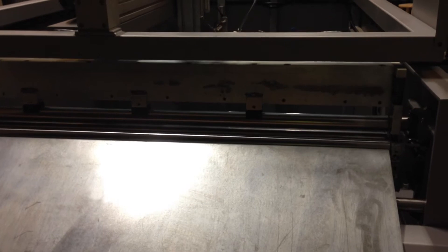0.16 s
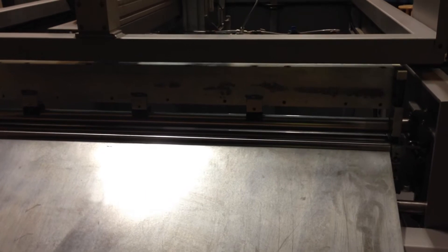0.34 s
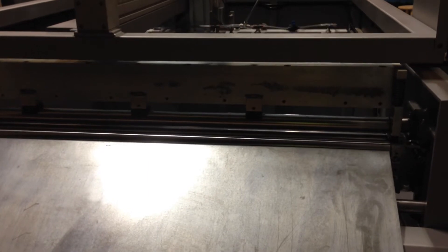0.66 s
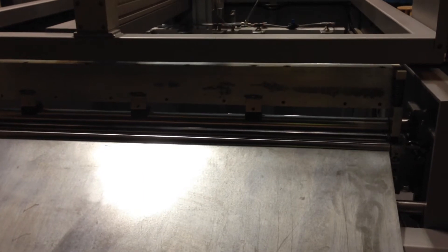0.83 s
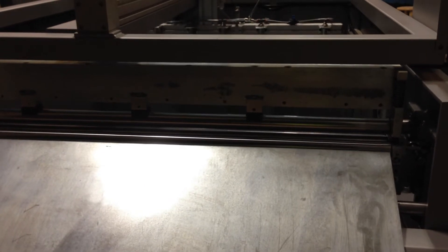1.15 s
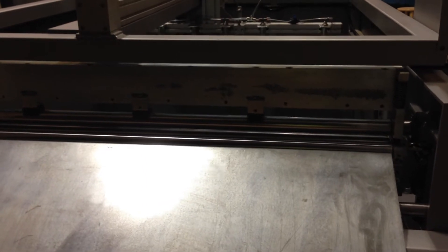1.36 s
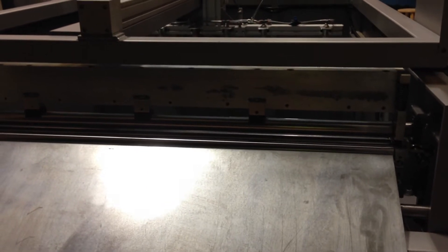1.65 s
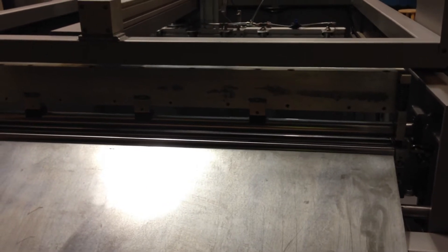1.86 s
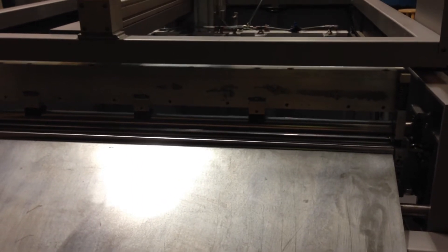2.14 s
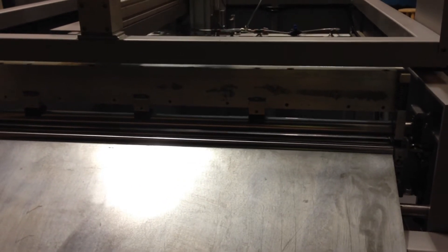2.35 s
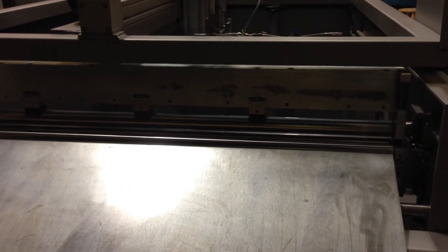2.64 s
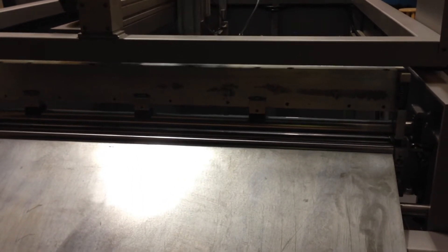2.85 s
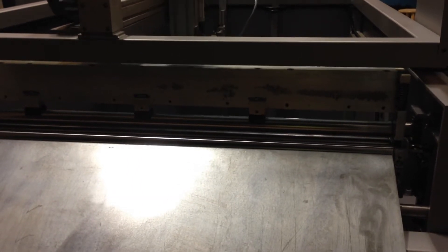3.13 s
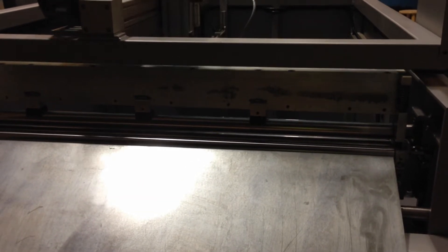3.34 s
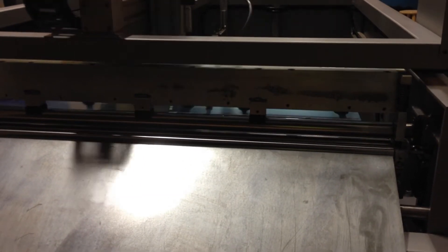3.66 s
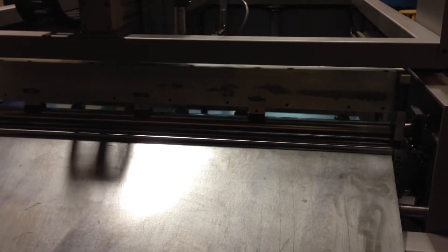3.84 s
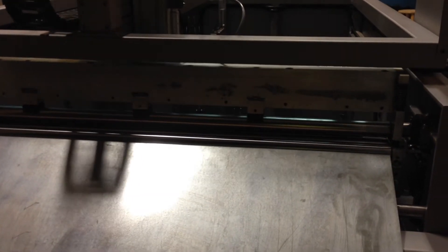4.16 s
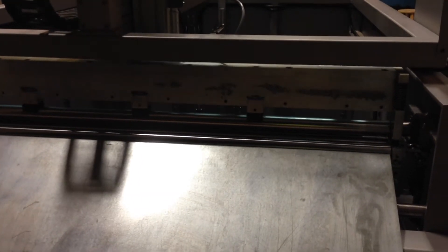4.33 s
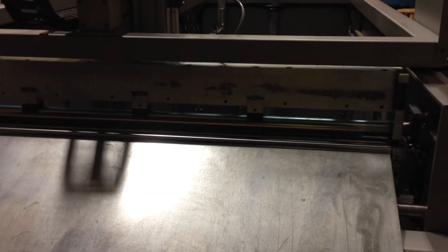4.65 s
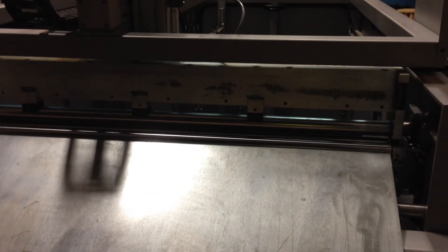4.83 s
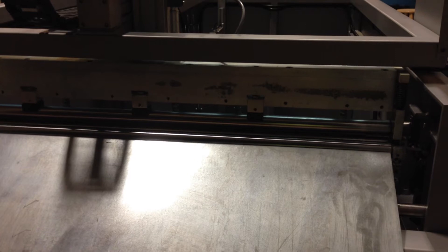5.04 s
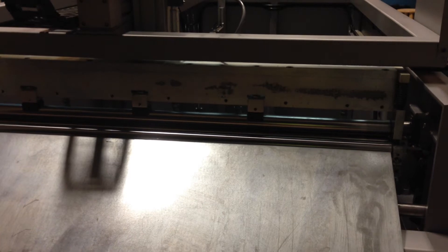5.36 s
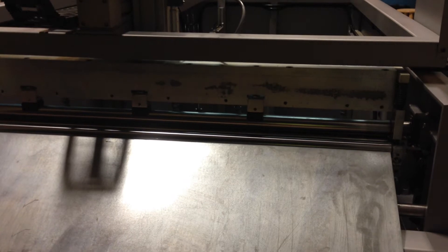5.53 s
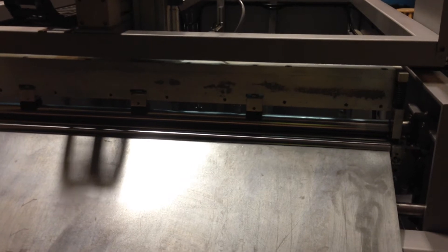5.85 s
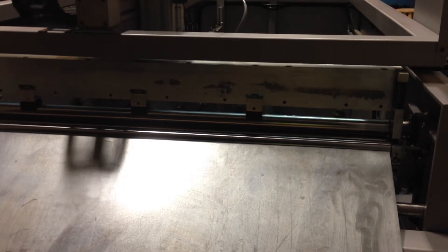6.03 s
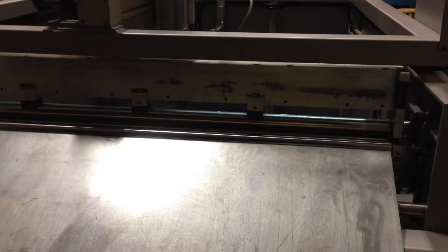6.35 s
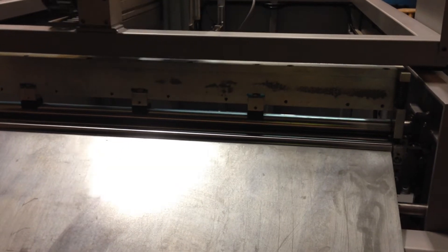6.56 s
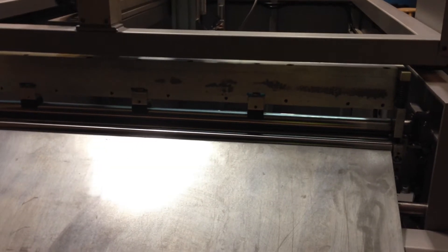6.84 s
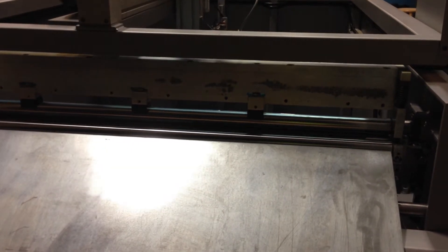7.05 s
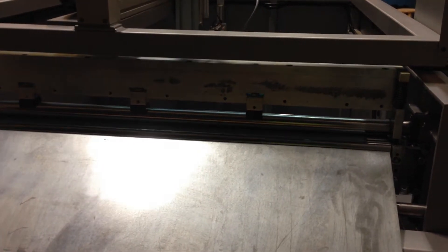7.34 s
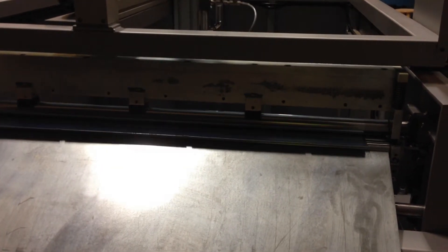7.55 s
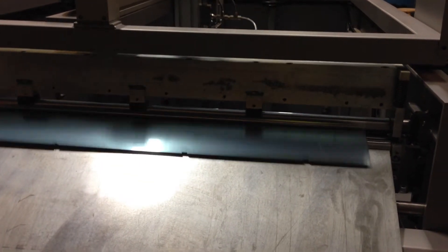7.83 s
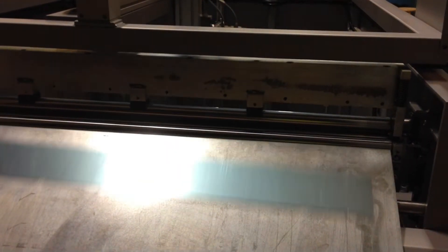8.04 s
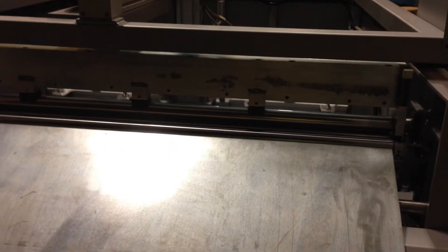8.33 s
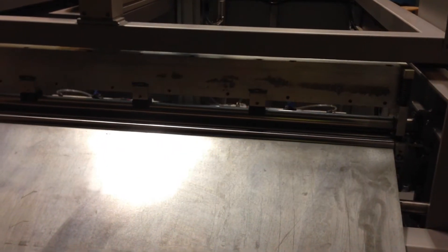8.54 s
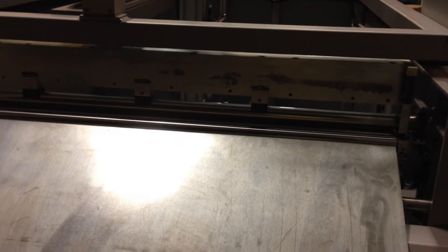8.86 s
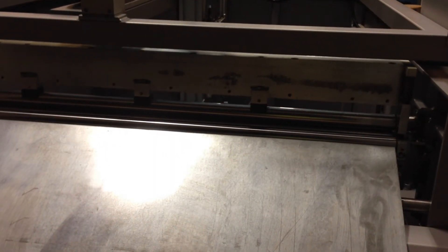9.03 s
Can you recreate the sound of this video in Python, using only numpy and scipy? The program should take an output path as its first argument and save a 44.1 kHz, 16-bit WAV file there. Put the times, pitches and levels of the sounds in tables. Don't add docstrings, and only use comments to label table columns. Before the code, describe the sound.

In a reverberant factory hall, heard close to a machine loader, a steady air leak hisses from 0 s with thin, very high drive whine, faint motor hums and low plant rumble. A distant dry squeak swells repeatedly until about 2.4 s. The hiss brightens and strengthens towards 4 s. At 5.43 s a valve snaps open: exhaust roars with a piercing, rough whistle, which steps to a slightly lower note near 5.75 s and collapses by 5.95 s. Hard steel clacks tumble from 5.97 to 6.14 s, with a second puff, its hiss and wall echo fading. The leak has stopped. Around 7 s the carriage groans and rattles off, gears whining as air rushes, swelling until a sharp stop at 7.94 s. Softer air continues; at 8.6 s a part lands with a hard clattering crack and an air burst. Gentle return air and dull knocks come near 9.1 s.

```python
import sys
import numpy as np
from scipy import signal
from scipy.fft import rfft, irfft, next_fast_len
from scipy.io import wavfile

SR = 44100
rng = np.random.default_rng(int(sys.argv[2]) if len(sys.argv) > 2 else 0)


def linear_from_db(decibels):
    return 10 ** (np.asarray(decibels, float) / 20)


def dump_mix(stems):
    frames = np.atleast_2d(stems).T
    limited = np.clip(frames, -1, 1)
    pcm = np.round(limited * 32767).astype(np.int16)
    wavfile.write(sys.argv[1], SR, pcm)


N = 405279
t = np.arange(N) / SR

# [t/s, level/dB]
EXHAUST_FLOW = [(5.45, -39), (5.466, -27), (5.502, -20.5), (5.586, -23.5), (5.78, -22.5), (5.885, -28.5),
                (5.95, -42), (6.3, -80), (6.9, -84)]


def columns(table):
    s, *cols = np.transpose(table)
    span = t[int(s[0] * SR):int(s[-1] * SR)]
    return [np.interp(span, s, c) for c in cols]


def walk(rate_hz, size):
    levels = rng.standard_normal(4096)
    return 1.13 * np.interp(np.arange(size) * rate_hz / SR, np.arange(4096), levels)


def swells(start_s, end_s, db, rise_s, fall_s):
    s = t[::88, None]
    before_s, after_s = np.clip(start_s - s, 0, None), np.clip(s - end_s, 0, None)
    drop_db = 20 * (before_s / rise_s + after_s / fall_s)
    return np.interp(t, s[:, 0], np.sqrt(np.sum(linear_from_db(db - drop_db) ** 2, axis=1)))


def air(colour, lo_hz, hi_hz, size, split_hz=6500, flicker_db=1.0):
    long = next_fast_len(size)
    hz = np.fft.rfftfreq(long, 1 / SR) + 1
    colour_hz, colour_db = np.transpose(colour)
    gain = linear_from_db(np.interp(np.log(hz), np.log(colour_hz), colour_db, -90, -90))
    x = rfft(rng.standard_normal(N + SR)[:long]) * gain
    band = (hz > lo_hz) & (hz < hi_hz)
    x /= np.sqrt(2 * np.sum(abs(x[band]) ** 2)) / long
    low = 1 / (1 + (hz / split_hz) ** 4)
    return [irfft(x * w, long)[:size] * linear_from_db(flicker_db * walk(14, size)) for w in (low, 1 - low)]


def blown(hz, width_hz, size):
    b, a = signal.iirpeak(hz, hz / width_hz, SR)
    x = rng.standard_normal(-(-size // SR) * SR)[:size]
    x = signal.lfilter(b, a, signal.lfilter(b, a, x))
    return x / x.std()


def tone(hz, flutter_db=2.0, rate_hz=30):
    phase = 2 * np.pi * (np.cumsum(hz) / SR + rng.random())
    return np.sqrt(2) * np.sin(phase) * linear_from_db(flutter_db * walk(rate_hz, len(hz)))


def ring(hz, t60_s):
    s = t[:int(SR * max(1.2 * t60_s, .01))]
    return np.sin(2 * np.pi * hz * s) * np.exp(-np.log(1000) * s / max(t60_s, 1e-4))


def add(out, at_s, x):
    i = int(at_s * SR)
    out[i:i + len(x)] += x[:N - i]


def place(x, table):
    out, edge = np.zeros(N), np.arange(len(x)) / 100
    start_s = table[0][0]
    fade = np.minimum(edge + (start_s == 0), edge[::-1] + 1)
    add(out, start_s, x * np.clip(fade, 0, 1))
    return out


def vent():
    # [t/s, f/Hz, level/dB, octave share/0-1]
    high_note = [(5.455, 1209, -36, .05), (5.467, 1202, -16, .02), (5.505, 1194, -18.5, .55),
                 (5.565, 1178, -17, .06), (5.7, 1181, -20, .3), (5.82, 1183, -20.5, .85),
                 (5.845, 1161, -19.5, .12), (5.887, 1158, -20, .25), (5.9, 1142, -32, .05)]
    low_note = [(5.74, 1152, -32, .5), (5.758, 1151, -19.5, .94), (5.88, 1124, -19.5, .14),
                (5.954, 1118, -21, .01), (5.98, 1138, -22, .5), (5.996, 1140, -35, .03),
                (6.1, 1152, -38, .15), (6.55, 1150, -61, .3)]
    roar = exhaust_roar()
    modes, pipe = draught()
    seat = whistle(high_note) + whistle(low_note)
    highpass = signal.butter(4, 1700, "high", fs=SR, output="sos")
    beats = signal.sosfilt(highpass, 3 * seat * pipe)
    return roar + modes + pipe + seat + beats


def whistle(note):
    # [multiple of pitch, level/dB re partial 4]
    upper_partials = [(3, 1.5), (5, -7), (6, -12), (7, -7), (8, -7), (9, -9), (10, -13), (11, -13),
                      (12, -15)]
    hz, db, octave = columns(note)
    size = len(hz)
    s, octave = np.arange(size) / SR, np.clip(octave, 0, 1)
    flow_db = np.interp(s + note[0][0], *np.transpose(EXHAUST_FLOW))
    full_flow_db, slope, rise_s = -28, 3.0, .02
    upper = linear_from_db(-30.5 + slope * np.minimum(flow_db - full_flow_db, 0)) * np.clip(s / rise_s, 0, 1)
    hz = hz * (1 + 0.003 * walk(118.5, size) + 0.004 * walk(500, size))
    first = np.sqrt(1 - octave) * tone(hz, 1.05, 60)
    second = np.sqrt(octave) * tone(2 * hz, 2.2, 60)
    out = linear_from_db(db) * (first + second) + upper * tone(4 * hz, 2.0, 60)
    for k, rel_db in upper_partials:
        skirt = 1 + .0008 * (k - 3) * walk(700, size)
        out += upper * linear_from_db(rel_db) * tone(k * hz * skirt, 3.0, 60)
    return place(out * (1 + 0.12 * walk(300, size)), note)


def exhaust_roar():
    # [f/Hz, density/dB per Hz]
    roar_colour = [(150, -37), (500, -12), (800, 4.5), (1200, 4), (1600, -0.5), (2300, -0.5), (3500, 2.5),
                   (5000, 3), (8000, 2), (11000, -1.5), (15200, -5.5), (15500, -40)]
    # [t/s, body/dB, treble/dB, 20 dB fall/s]
    puffs = [
        (5.466, -29, -60, .34),
        (5.91, -41, -60, .2),
        (5.974, -29.5, -60, .04),
        (6.066, -31, -36, .05),
        (6.084, -36, -31, .3),
    ]
    flow_db, = columns(EXHAUST_FLOW)
    low, high = air(roar_colour, 6760, 10400, len(flow_db), split_hz=3400, flicker_db=2.0)
    high = port(high)
    at_s, body_db, treble_db, fall_s = np.transpose(puffs)
    rise_s = .02
    puff_treble = swells(at_s, at_s, treble_db, rise_s, .65 * fall_s)
    treble = np.hypot(place(linear_from_db(flow_db), EXHAUST_FLOW), puff_treble)
    body = swells(at_s, at_s, body_db + 9, rise_s, fall_s) * place(low, EXHAUST_FLOW)
    return body + linear_from_db(-4.5) * treble * place(high, EXHAUST_FLOW)


def port(x):
    # [t/s, round trip/Hz, echo/0-1]
    port_pitch = [(5.45, 1170, 0.44), (5.7, 1170, 0.3), (5.78, 1169, 0.5), (5.86, 1135, .75),
                  (5.91, 1110, .6), (5.96, 1110, .05), (6.9, 1110, .05)]
    hz, echo = columns(port_pitch)
    i = np.arange(len(x))
    once, twice = np.interp(i - SR / hz, i, x), np.interp(i - 2 * SR / hz, i, x)
    return (x + echo * once + echo ** 2 * twice) / np.sqrt(1 + echo ** 2 + echo ** 4)


def draught():
    # [t/s, level/dB]
    draught_level = [(5.462, -34), (5.49, -21), (5.62, -24), (5.77, -26), (5.8, -42), (5.855, -45),
                     (5.88, -31), (5.95, -29.5), (6.05, -50)]
    # [f/Hz, width/Hz, level/dB]
    pipe_modes = [(1001, 35, -6), (1060, 30, -2.5), (1101, 30, -3), (2120, 45, -11), (4560, 60, -10)]
    blow_db, = columns(draught_level)
    size = len(blow_db)
    tone_db = -22 + 1.4 * (blow_db - blow_db.max())
    hz = 779 * (1 + 0.0048 * walk(120, size) + .012 * walk(30, size))
    pipe = place(linear_from_db(tone_db) * tone(hz, 1.9, 50), draught_level)
    modes = sum(linear_from_db(db) * blown(f, w, size) for f, w, db in pipe_modes)
    return place(linear_from_db(blow_db + 0.5) * modes, draught_level), pipe


def clacks():
    # [t/s, low ring/dB, low ring/Hz, high ring/Hz, crack/dB]
    valve_clacks = [
        (5.431, -41, 1170, 6000, -31),
        (5.974, -23, 1137, 2420, -34),
        (6.028, -22, 1110, 8000, -39),
        (6.062, -20, 1800, 8160, -18),
        (6.105, -15, 800, 3380, -36),
        (6.137, -22, 934, 3560, -42),
    ]
    carriage_clacks = [(7.029, -40, 780, 6990, -54), (7.048, -38, 900, 6660, -52),
                       (7.083, -29, 1396, 5800, -43), (7.091, -32, 1000, 4700, -47),
                       (7.098, -31, 1050, 5800, -46), (7.106, -30, 940, 4600, -45),
                       (7.117, -32, 1000, 4700, -50), (7.15, -35, 950, 3500, -54),
                       (7.224, -33, 980, 4800, -50), (7.291, -31, 680, 3450, -32.5),
                       (7.369, -38, 1000, 3500, -48), (7.49, -28, 930, 4800, -44),
                       (7.936, -36, 645, 2830, -32), (7.942, -22, 750, 2400, -26),
                       (9.117, -30.5, 1650, 2340, -48), (9.142, -25, 1305, 2050, -38),
                       (9.15, -36, 650, 1920, -41)]
    stop_clacks = [
        (8.561, -33, 1950, 5500, -39),
        (8.567, -29, 1230, 2870, -39),
        (8.576, -27, 1130, 2900, -40),
        (8.585, -15, 1300, 6400, -18),
        (8.592, -17, 1470, 2920, -19),
        (8.596, -21, 560, 5100, -12.5),
        (8.6025, -24, 1850, 4200, -18),
        (8.607, -26, 2400, 3400, -26),
        (8.634, -33, 1500, 2890, -35),
    ]
    # [t/s, level/dB, f/Hz]
    snaps = [
        (5.4305, -20, 7100),
        (7.9419, -4.5, 4600),
        (8.5962, -8, 3500),
        (6.0635, -14, 4000),
        (7.0835, -28, 1500),
        (5.431, -26, 13000),
        (6.064, -12, 13000),
    ]
    # [t/s, level/dB, f/Hz, t60/s]
    thud_modes = [(5.462, -29.5, 599, 0.18), (6.035, -36.5, 200, 0.7), (1.02, -48, 290, .35),
                  (6.51, -44, 280, .25), (6.575, -41, 310, 0.38), (7.945, -41, 700, .4),
                  (7.95, -44, 716, .6), (7.96, -46, 774, .4), (8.0, -48, 200, .6), (8.5815, -12, 1230, .05),
                  (8.5855, -7, 1260, .03), (8.586, -16, 610, .04), (.9, -47, 380, .3),
                  (8.585, -11, 2750, .03), (6.103, -27, 520, .09), (6.024, -29, 560, .08),
                  (6.064, -27, 960, .07), (5.972, -28, 1800, .07), (7.941, -43, 200, .08),
                  (8.591, -39, 170, .15), (8.594, -29, 523, 0.056), (8.605, -36, 8250, .08)]
    rings, cracks, thuds = np.zeros(N), np.zeros(N), np.zeros(N)
    parts = (valve_clacks, .05), (carriage_clacks, .045), (stop_clacks, .038)
    blows = [(*row, t60_s) for table, t60_s in parts for row in table]
    chances = rng.standard_normal((len(blows), 4096))
    for (at_s, low_db, low_hz, high_hz, crack_db, t60_s), chance in zip(blows, chances):
        fade = np.exp(-t[:4096] / max(t60_s, .005))
        crack = signal.lfilter(*signal.iirpeak(4200, .8, SR), chance) * fade ** 9
        rattle = signal.lfilter(*signal.iirpeak(low_hz, 2.8, SR), chance[::-1] * fade ** 5)
        add(cracks, at_s, linear_from_db(crack_db + 3.5) * crack)
        add(rings, at_s, linear_from_db(low_db + 8) * rattle)
        add(rings, at_s, linear_from_db(low_db - 5.5) * ring(low_hz, t60_s))
        for k in range(3):
            mode_hz = high_hz * (1 + 0.104 * k * chance[k + 3])
            add(rings, at_s, linear_from_db(crack_db - 3.5 - 4.4 * k) * ring(mode_hz, 1.2 * t60_s))
    for at_s, db, hz in snaps:
        add(rings, at_s, -1.6 * linear_from_db(db) * ring(hz, 8.6 / hz)[:200])
    for at_s, db, hz, t60_s in thud_modes:
        thud = ring(hz, t60_s)
        onset = np.clip(t[:len(thud)] * hz / 2, 0, 1)
        add(thuds, at_s, linear_from_db(db) * thud * onset)
    return rings + cracks + thuds, cracks + 0.5 * rings + .04 * thuds


def stroke():
    # [f/Hz, density/dB per Hz]
    stroke_colour = [(300, -40), (700, -10), (1700, -8.5), (3200, -6), (4200, -10), (6800, -10),
                     (9000, -12), (12000, -13.5), (15200, -18), (15500, -50)]
    # [start/s, end/s, jet/dB, treble/dB, 20 dB rise/s]
    strokes = [
        (7.13, 7.3, -46, -74, .32),
        (7.42, 7.92, -39, -50.5, .25),
        (7.95, 8.1, -44.5, -54, .05),
        (8.1, 8.58, -48, -54, .1),
        (8.625, 8.68, -36.5, -54, .04),
        (8.95, 9.3, -49, -60, .3),
        (9.17, 9.3, -46, -66, .2),
    ]
    # [start/s, end/s, level/dB, 20 dB rise/s]
    nozzle_swells = [
        (7.6, 7.92, -52, .4),
        (8.25, 8.55, -49, .5),
        (8.63, 8.72, -48, .05),
        (8.85, 9.05, -54, .3),
    ]
    fall_s = .28
    start_s, end_s, jet_db, treble_db, rise_s = np.transpose(strokes)
    low, high = air(stroke_colour, 1500, 6200, N)
    jet = swells(start_s, end_s, jet_db - 3.75, rise_s, fall_s) * low
    treble = swells(start_s, end_s, treble_db + 5, rise_s, fall_s) * high
    on_s, off_s, nozzle_db, swell_s = np.transpose(nozzle_swells)
    nozzle = swells(on_s, off_s, nozzle_db, swell_s, fall_s) * blown(2850, 1300, N)
    return nozzle + jet + treble


def leak():
    # [t/s, jet/dB]
    pressure = [(0.0, -45.5), (1.41, -44.5), (3.3, -43.5), (3.99, -40.5), (5.34, -40.5), (5.45, -41)]
    # [f/Hz, density/dB per Hz]
    early_colour = [(500, -14), (900, -18.5), (1400, -8), (2000, -1), (2750, 1), (3400, 0.5), (4000, -6.5),
                    (5300, -5), (8200, -3), (9300, -9), (11000, -10), (12300, -12), (15200, -15.5),
                    (15500, -50)]
    late_colour = [(500, -12), (1170, -20), (1850, -4), (2400, -10), (3200, -0.5), (3900, -9.5), (4900, -3),
                   (6500, -8.5), (7600, -9), (9100, -12.5), (11500, -14), (12800, -14), (15200, -18),
                   (15500, -50)]
    # [f/Hz, level/dB re jet]
    streaks = [(2420, -19), (2720, -16), (2940, -14), (3230, -15), (3390, -18), (4890, -17), (7030, -18),
               (7490, -19)]
    jet_db, = columns(pressure)
    size = len(jet_db)
    turn_s, turn_length_s = 2.6, 1.8
    late = np.clip((t[:size] - turn_s) / turn_length_s, 0, 1)
    early_air = air(early_colour, 1500, 6360, size, flicker_db=.6)
    late_air = air(late_colour, 1500, 6100, size, flicker_db=.6)
    low, high = (np.sqrt(1 - late) * a + np.sqrt(late) * b for a, b in zip(early_air, late_air))
    treble_db = -43.5 + .4 * (jet_db - pressure[0][1])
    for hz, db in streaks:
        low = low + linear_from_db(db + 4.0 * walk(2.5, size)) * blown(hz, 70, size)
    return place(linear_from_db(jet_db - .4) * low + linear_from_db(treble_db) * high, pressure)


def chopper():
    # [start/s, end/s, current at speed/Hz, level/dB]
    moves = [
        (-.05, 1.5, 148, -58),
        (1.55, 4.2, 148, -58),
        (5.8, 7.17, 148, -60),
        (7.27, 9.05, 75, -54),
        (9.05, 9.6, 150, -66),
    ]
    # [order of current, level/dB]
    fast_tones = [(-2, -14), (-1, -4), (0, -7), (1, 0), (2, -10), (3, -19)]
    slow_tones = [(-1, 11.5), (0, -2), (1, 3)]
    chop_hz, ramp_hz_per_s, resting_db = 11998, 520, -68
    reverses_s, recedes_db_per_s, quieter_s, quieter_db = 7.27, 5, 8.6, -8
    current_hz, drive_db = 0 * t, resting_db + 0 * t
    for start_s, end_s, hz, db in moves:
        speed_hz = np.clip(ramp_hz_per_s * np.minimum(t - start_s, end_s - t), 0, hz)
        current_hz = current_hz + speed_hz
        drive_db = drive_db + (db - resting_db) * speed_hz / hz
    slow = np.clip((t - reverses_s) / .05, 0, 1)
    loss_db = recedes_db_per_s * np.clip(t - reverses_s, 0, None) - quieter_db * (t > quieter_s)
    drive_db = drive_db - loss_db * (t < moves[-1][0])
    chop = sum((1 - slow) * linear_from_db(db) * tone(chop_hz + k * current_hz, 2.5, 12) for k, db in fast_tones)
    chop += sum(slow * linear_from_db(db) * tone(chop_hz + k * current_hz, 0.75) for k, db in slow_tones)
    return linear_from_db(drive_db) * chop


def idle_whine():
    # [f/Hz, level/dB]
    idle_tones = [(2256, -73.5), (4823, -66.5), (5776, -72), (6438, -72), (6729, -65), (7031, -63),
                  (7321, -68), (11192, -80), (11553, -88)]
    tones = sum(linear_from_db(db) * tone(f + 0 * t, 2.9) for f, db in idle_tones)
    return np.clip((7.07 - t) / 0.08, 0, 1) * tones


def gear_whine():
    # [t/s, shaft/Hz, level/dB]
    carriage_run = [(6.93, 181, -28), (7.0, 193, -9), (7.08, 198, -2), (7.13, 199.3, -0.5), (7.5, 200, 5),
                    (7.9, 201, 1), (7.95, 195, 0), (8.02, 198, -30)]
    # [shaft order, level/dB]
    gear_tones = [(5, -67), (16, -65), (25, -66), (26, -66), (34, -51), (35, -57), (37, -60), (40, -67)]
    shaft_hz, gear_db = columns(carriage_run)
    gears = 0
    for k, db in gear_tones:
        hz = k * shaft_hz * (1 + .002 * walk(200, len(shaft_hz)))
        gears = gears + linear_from_db(db) * tone(hz, 2.5, 12)
    return place(linear_from_db(gear_db) * gears, carriage_run)


def groan():
    # [t/s, f/Hz, level/dB]
    run_up = [(6.98, 758, -56), (7.04, 850, -54), (7.09, 990, -45), (7.13, 1020, -44), (7.2, 1000, -58)]
    hz, db = columns(run_up)
    rough_hz = hz * (1 + .09 * walk(300, len(hz)))
    return place(linear_from_db(db) * tone(rough_hz, 3.0, 117), run_up)


def far_squeak():
    # [t/s, level/dB, 20 dB rise or fall/s]
    squeak_swells = [(.1, -55, .3), (.3, -51, .3), (.65, -50, .3), (1.05, -48, .25), (1.48, -48.5, .25),
                     (1.66, -56, .2), (1.84, -48, .3), (2.17, -58, .3), (2.39, -54, .2), (6.95, -53, .08),
                     (6.99, -53, .1), (7.03, -54, .08), (7.104, -54, .06)]
    at_s, db, edge_s = np.transpose(squeak_swells)
    return swells(at_s, at_s, db, edge_s, edge_s) * blown(4456, 160, N)


def far_hums():
    # [start/s, end/s, f/Hz, level/dB]
    hums = [
        (0.34, 0.96, 510, -61.5),
        (0.36, 2.03, 940, -66),
        (1.9, 4.8, 245, -62.5),
        (4.85, 5.3, 610, -57.5),
        (6.5, 7.0, 1900, -70),
    ]
    out = np.zeros(N)
    for start_s, end_s, hz, db in hums:
        size = int((end_s - start_s) * SR)
        add(out, start_s, linear_from_db(db) * blown(hz, 8.4, size) * signal.windows.tukey(size, .4))
    return out


def walls(x):
    # [f/Hz, t60/s]
    tails = [(400, 0.46), (1000, 0.82), (2500, 1.42), (5000, 0.88), (10000, 0.31)]
    s = t[:SR]
    tail = sum(blown(hz, hz, SR) * np.sqrt(hz) * np.exp(-np.log(1000) * s / t60_s) for hz, t60_s in tails)
    tail *= 1 - np.exp(-(s / 0.012) ** 2)
    return signal.fftconvolve(x, tail / np.sqrt(np.sum(tail ** 2)))[:N]


def hall():
    # [f/Hz, density/dB per Hz]
    plant_colour = [(60, -11.5), (170, -5), (500, -10), (1000, -7.5), (1600, -12), (3000, -15.5),
                    (4600, -10.5), (7000, -18), (8000, -26), (11000, -24), (12400, -10), (12900, -50)]
    # [t/s, low/dB, upper/dB, 20 dB fall/s]
    rumbles = [(.25, -57, -56, .3), (.59, -53, -60, .35), (.87, -56, -48, .15), (.93, -48, -42, .16),
               (1.05, -54, -58, .2), (1.85, -49, -54, .3), (2.61, -58, -57, .6), (3.62, -57, -56, .4),
               (4.33, -54, -66, .15), (4.83, -48.5, -54, .2), (5.0, -54, -50, .3), (5.14, -56, -50, .4),
               (5.45, -42, -53, .07), (6.05, -54, -37, .3), (6.18, -50, -44, .2), (6.57, -50, -49, .3),
               (7.19, -57, -45.5, .3), (7.27, -46, -54, .2), (7.55, -50, -45.5, .3),
               (7.68, -43, -48.5, .25), (7.86, -44, -52, .1), (7.94, -46, -50, .12), (8.1, -52, -64, .3),
               (8.58, -56, -47, .1), (8.91, -50, -68, .1), (9.14, -61, -52, .1)]
    at_s, low_db, upper_db, fall_s = np.transpose(rumbles)
    out = linear_from_db(-54.5) * sum(air(plant_colour, 20, 16000, N))
    bands = (low_db - 4.0, -62, 202, 140), (upper_db - .5, -60, 340, 420)
    for db, bed_db, hz, width_hz in bands:
        bed = swells(0, 8.2, bed_db, 1, .8) * linear_from_db(2.5 * walk(5, N))
        passing = swells(at_s, at_s, db, .5 * fall_s, fall_s)
        out += np.hypot(bed, passing) * blown(hz, width_hz, N)
    return out


def scene():
    (hits, broad), valve = clacks(), vent()
    echo = walls(linear_from_db(-15) * broad + linear_from_db(-20) * valve)
    drives = chopper() + idle_whine() + gear_whine() + groan()
    far = far_squeak() + far_hums() + hall()
    return (valve + hits + echo + stroke() + leak() + drives + far)[None]


def band_limit(x):
    return signal.sosfilt(signal.butter(12, 16620, fs=SR, output="sos"), x)


def record(dry):
    x = 1.198 * np.tanh(dry / 1.202)
    x = signal.sosfilt(signal.butter(3, 110, "high", fs=SR, output="sos"), x)
    x = signal.sosfilt(signal.ellip(8, .3, 36, 15350, fs=SR, output="sos"), x)
    return band_limit(x)


dry = scene()
out = record(dry)
dump_mix(out)
```